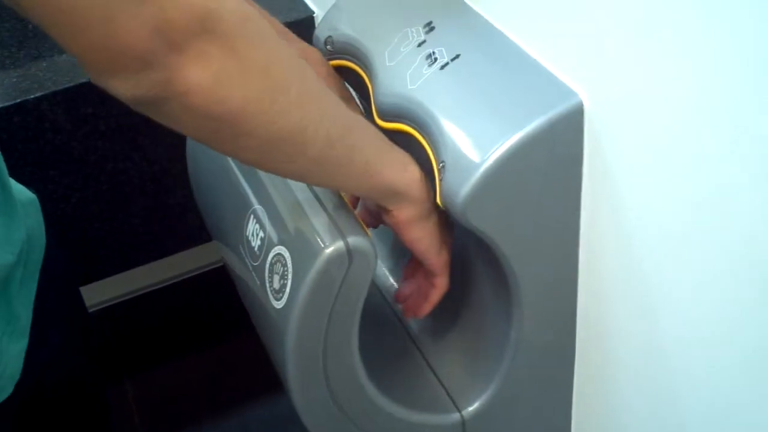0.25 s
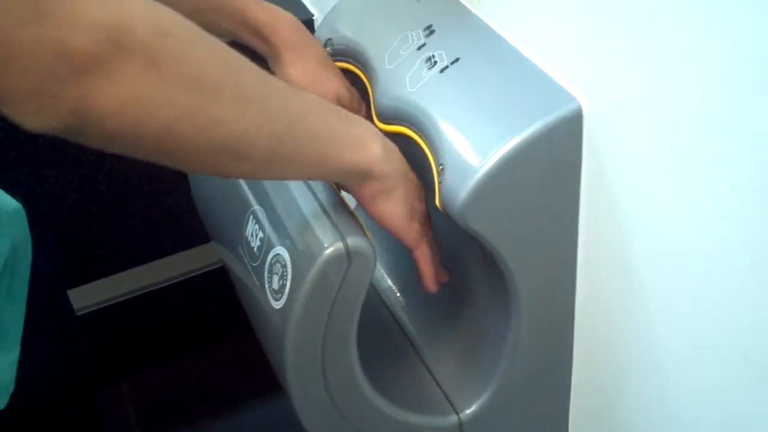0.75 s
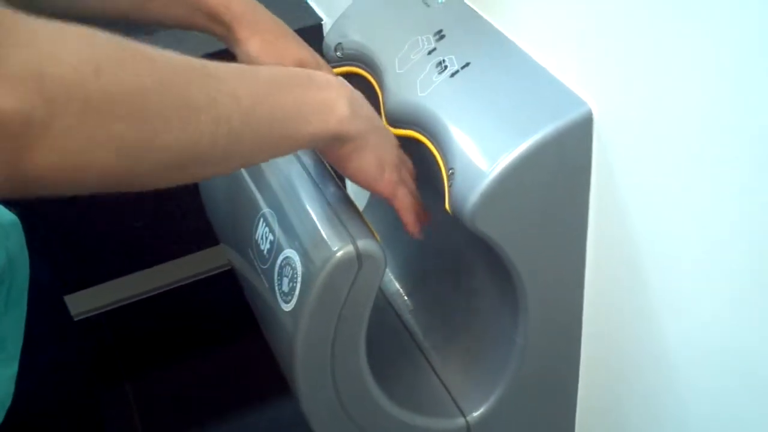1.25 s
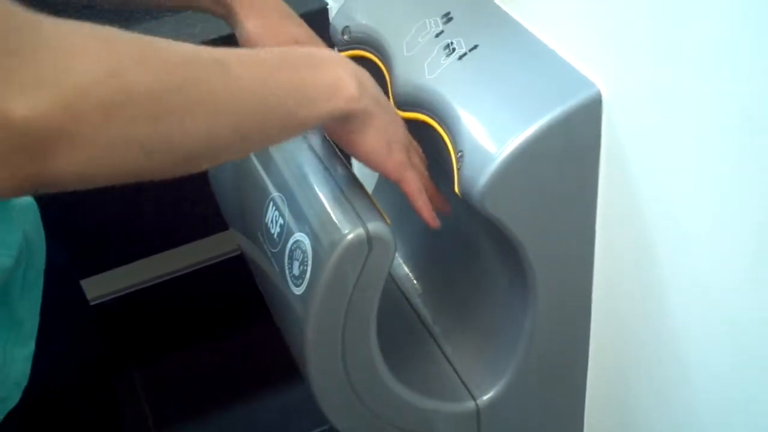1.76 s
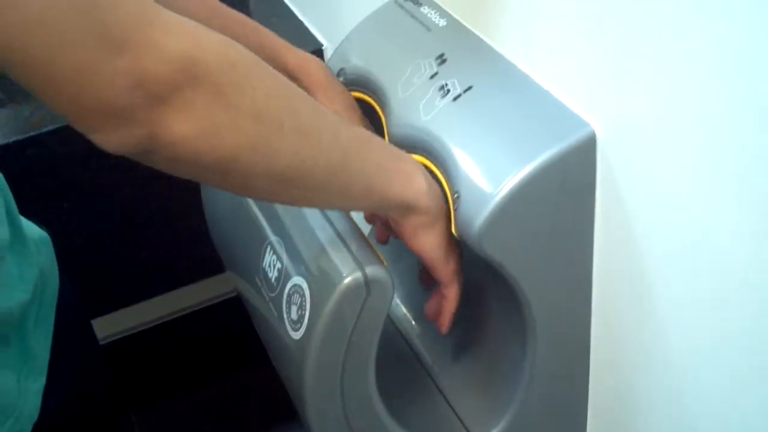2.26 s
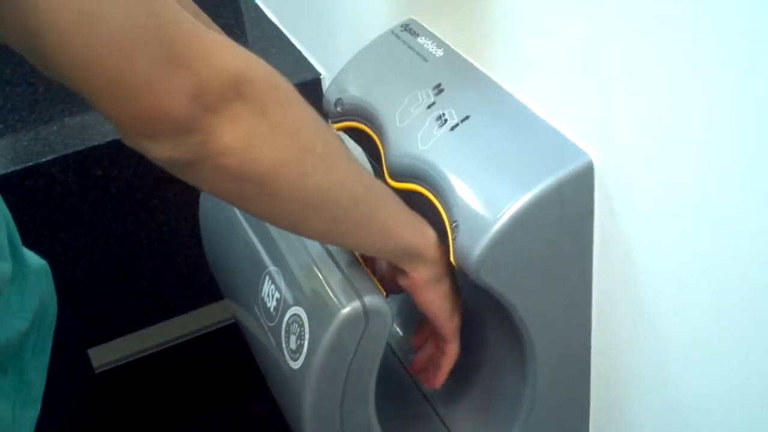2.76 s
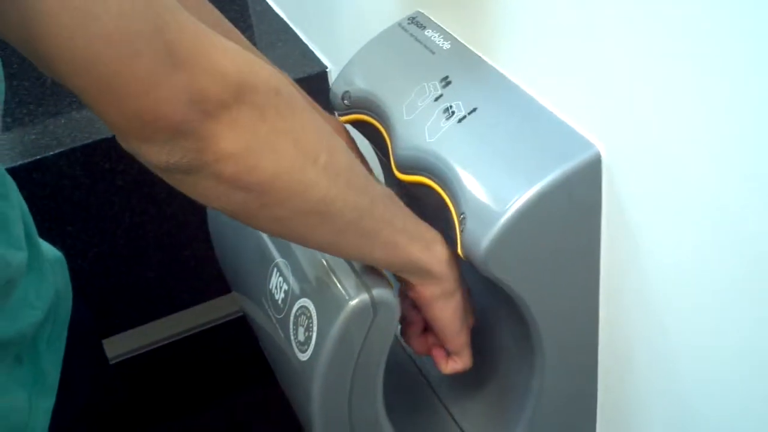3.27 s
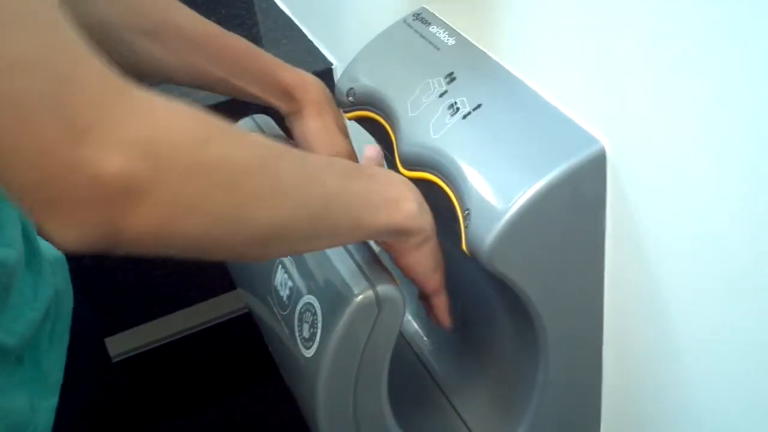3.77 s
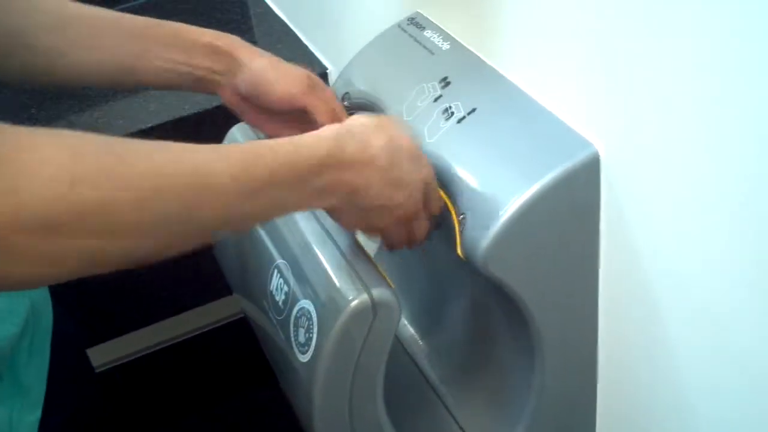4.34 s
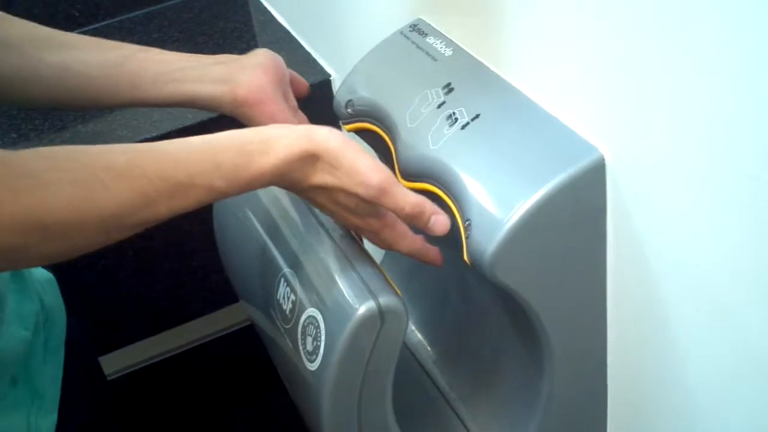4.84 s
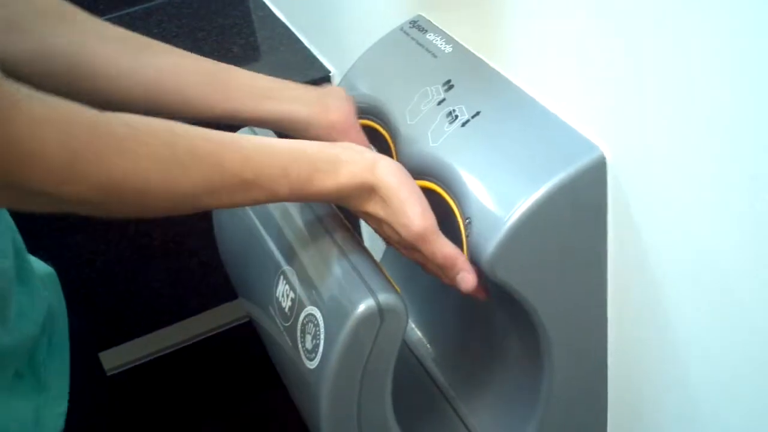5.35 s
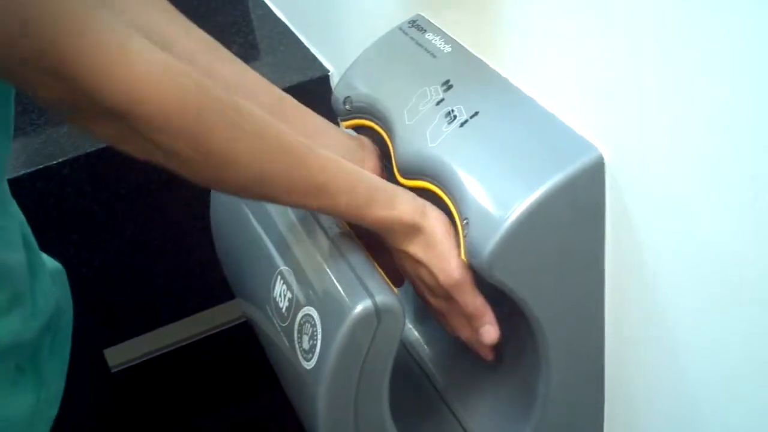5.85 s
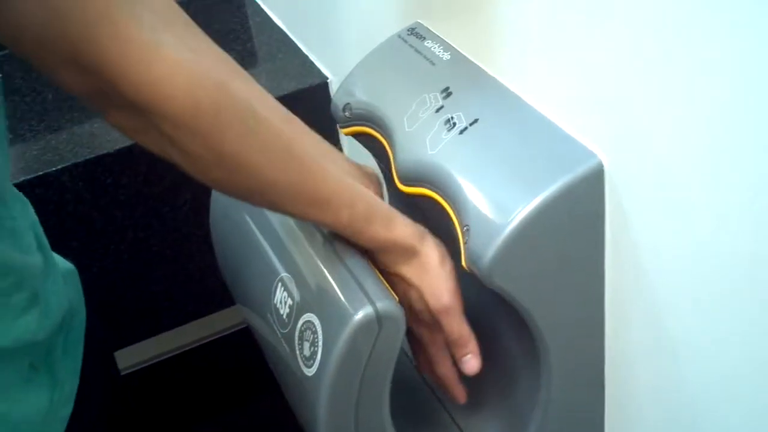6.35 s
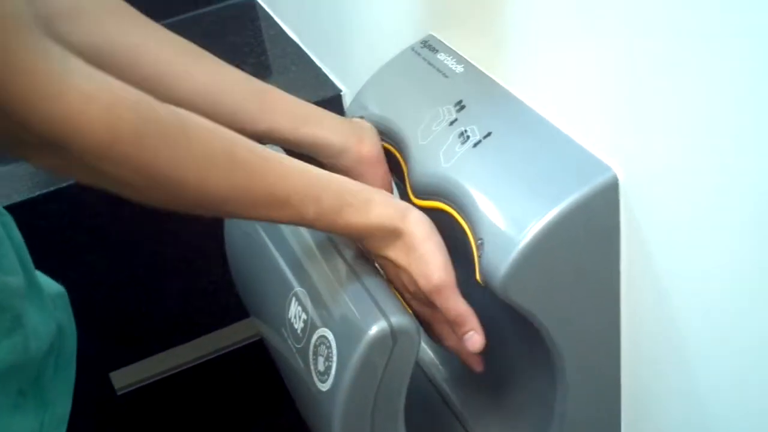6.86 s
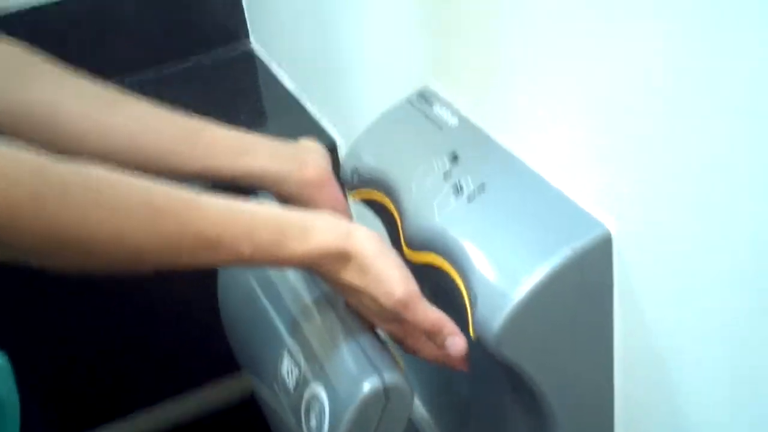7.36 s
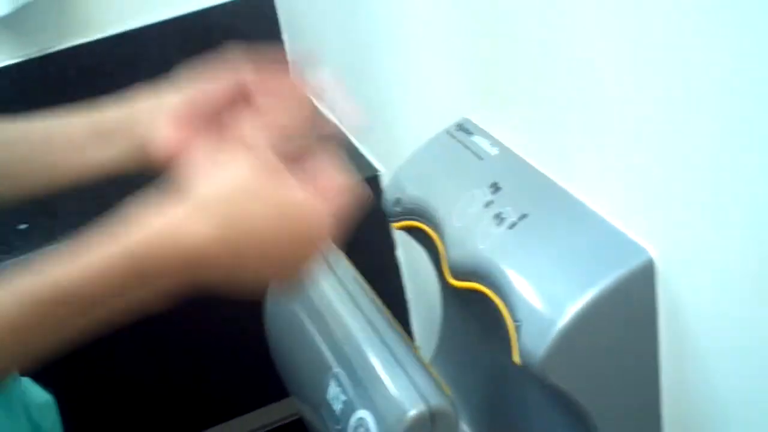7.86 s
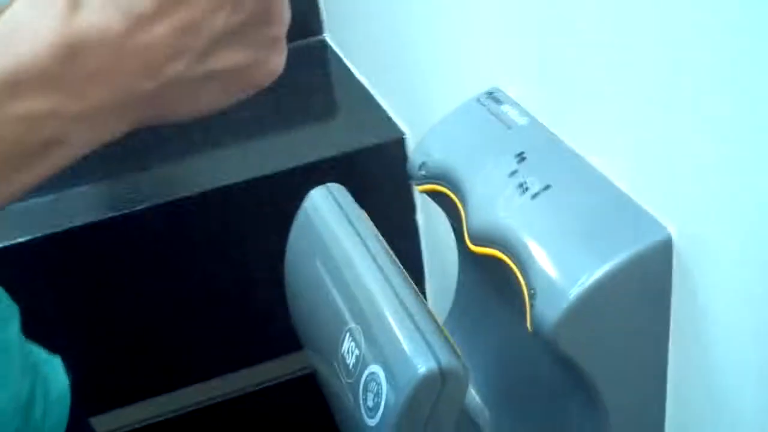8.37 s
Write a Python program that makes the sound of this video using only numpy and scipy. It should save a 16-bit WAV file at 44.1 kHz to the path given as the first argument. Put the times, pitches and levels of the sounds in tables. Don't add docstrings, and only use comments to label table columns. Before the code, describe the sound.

From the first instant a hand dryer blows at full strength in a small hard-walled room, heard close in wide stereo. A dense airy roar, splashing midrange and sharp hiss sit over a constant high whine near 1.5 kHz with a stronger tone an octave above. Hands sliding through the slot keep reshaping the blast: brighter spatter from about 1 to 2 s, a hiss flare near 2.4 s with a tiny whistle, then a duller, hollower dip around 3 s with low thumps. Wind puffs bump the microphone near 0.3, 1.6, 2.3 and 5 s. From 4 to 5.5 s the splash is strongest; it eases around 6 s. Hiss flares near 6.7 s and quick breathy whistles chirp about 7 s. After a last bright swell at 7.5 s the hands leave, splash falls, and a hollow hooting roar and whine continue to the cut at 8.6 s.

```python
import sys
import numpy as np
from scipy import signal
from scipy.fft import rfft, irfft, next_fast_len
from scipy.io import wavfile
from scipy.ndimage import uniform_filter1d, map_coordinates

SR = 44100
rng = np.random.default_rng(int(sys.argv[2]) if len(sys.argv) > 2 else 0)


def convert_level_to_amplitude(level_db):
    exponent = np.asarray(level_db, float) / 20
    return 10 ** exponent


def master_out(mix):
    frames = np.transpose(np.atleast_2d(mix))
    ceiling = np.clip(frames, -1, 1)
    pcm = np.round(ceiling * 32767).astype(np.int16)
    wavfile.write(sys.argv[1], SR, pcm)


N = 379701
QUIET_DB = -60


def jets():
    # f/Hz, level/dB
    drone_colour = [(20, -24), (70, -20.5), (120, -7), (170, 1.5), (220, -3), (300, 2.5), (500, -46)]
    roar_colour = [(120, -27), (230, 0), (300, -2.5), (550, 1), (750, -6.5), (1100, -13), (2500, -49)]
    splash_colour = [(300, -40), (650, -8), (900, -1), (1500, -1), (2150, 1), (2700, -2.5), (3200, -5),
                     (3800, -8.5), (5000, -12), (6000, -24), (7500, -50)]
    hiss_colour = [(1800, -40), (2800, -15), (3800, -10), (5300, -9), (6000, -4.5), (6500, -1.5), (8400, 0),
                   (9500, -2), (11000, -4.5), (12500, -6.5), (14500, -6.5), (15700, -5)]
    # t/s, skin struck/dB, slits uncovered/dB
    hands = [(0, -6, -3), (.12, -2, -3), (.4, -1.5, 2.5), (.65, -1.5, 1), (.95, 2.5, 0), (1.6, 2, -1),
             (2.08, 2.5, -0.5), (2.75, -6.5, -3), (3.05, -4.5, -5), (3.6, -1.5, -1.5), (4.1, 3.5, 0),
             (5.3, 4, -0.5), (5.63, 1.1, 0.5), (6.0, -1.5, 1.5), (6.78, -2.5, -1.3), (7.5, 2.5, -1.2),
             (7.8, -8, -4), (8.61, -7.5, -1)]
    # t/s, length/s, level/dB
    edges = [(.73, .18, 2.5), (1.15, 0.3, 3.5), (2.43, 0.41, 7), (3.76, 0.12, 1.5), (4.22, 0.2, 4),
             (4.87, 0.13, -1.5), (5.63, 0.18, -2.5), (6.08, 0.43, 1.5), (6.66, 0.21, 5.5),
             (7.07, 0.18, 2.5), (7.62, 0.19, 5.5)]
    # t/s, length/s, splash level/dB
    palms = [(1.2, 0.23, -1.5), (3.0, .08, -1), (3.25, 0.25, 0.5), (4.08, 0.18, 1.5), (4.3, 0.51, -2),
             (4.7, .2, -0.2), (4.87, .12, -2.5), (5.27, 0.15, 2), (6.8, 0.12, -1.6), (7.03, 0.12, 0.7),
             (7.5, .14, 1.5)]
    # t/s, length/s, roar level/dB
    cups = [(.05, .2, 1), (.68, 0.22, 1.5), (1.02, 0.14, 3.5), (1.6, 0.26, -1.5), (2.08, .08, 1.5),
            (2.66, 0.17, -3), (2.95, .12, -1.5), (3.1, .16, -3), (3.58, 0.43, 5), (4.98, .12, 3.5),
            (5.26, .16, 3.5), (5.63, 0.11, -2.5), (5.85, .3, 2), (6.45, 0.23, 1.5), (6.76, 0.21, -5.5),
            (7.04, 0.2, -5), (7.48, .3, 1.5), (7.9, 0.39, 2.5), (8.65, .6, 4.5)]
    # t/s, length/s, drone level/dB
    thumps = [(.3, 0.43, 3.5), (1.02, 0.19, 8), (1.8, .4, 5), (2.11, .05, -8), (2.5, .2, -5),
              (2.85, .15, 4), (3.07, .07, 8), (3.22, 0.089, 7), (3.45, 0.24, 8), (3.75, .2, 3),
              (4.3, 0.22, 4), (4.98, .14, 5), (5.8, 0.45, -3), (6.12, .2, -7), (6.5, 0.46, 6.5),
              (7.85, .3, -4)]
    choke = 1.2
    roar_follows = 0.34

    skin_db, slits_db = curves(hands)
    flare_db = swells(edges)
    drone_db = -44.5 + swells(thumps) - choke * flare_db + 1.3 * wobble(8.1)
    roar_db = -31 + roar_follows * skin_db + swells(cups) + 0.63 * wobble(9)
    splash_db = -26 + skin_db + swells(palms) + 0.19 * wobble(9)
    hiss_db = -24.5 + slits_db + flare_db

    drone = convert_level_to_amplitude(drone_db + 6) * rush(drone_colour, patchy_db=0.6)
    roar = convert_level_to_amplitude(roar_db - 1.87) * rush(roar_colour, patchy_db=-0.1)
    flutter_db = 0.28 * wobble(18) + 0.31 * wobble(60)
    splash = convert_level_to_amplitude(splash_db - 5.0) * rush(splash_colour, patchy_db=0.76)
    hiss = convert_level_to_amplitude(hiss_db - 1.0 + flutter_db) * rush(hiss_colour, patchy_db=0.44)
    return drone + roar + splash + hiss


def gaps():
    # t/s, length/s, from f/Hz, to f/Hz, level/dB
    hoots = [(3.25, .33, 180, 190, -31), (3.25, .6, 250, 600, -31.5), (4.85, .75, 190, 1850, -36),
             (5.56, .46, 158, 188, -34), (6.2, .45, 155, 175, -35.5), (5.95, .75, 1350, 1270, -41.5),
             (3.87, .45, 1350, 1760, -38), (6.83, .33, 2800, 3150, -39), (7.66, .45, 260, 390, -34),
             (7.85, 1.0, 390, 430, -31), (8.0, .8, 300, 320, -36), (7.95, .9, 520, 550, -34),
             (6.65, .5, 180, 240, -36), (7.35, .35, 2900, 3100, -42)]
    # t/s, length/s, from f/Hz, to f/Hz, level/dB
    whistles = [
        (6.915, .06, 2430, 2480, -38),
        (6.96, .065, 2750, 3200, -34),
        (6.985, .08, 2350, 2200, -39),
        (7.09, .08, 2900, 3050, -39),
        (2.375, .065, 3200, 3040, -39),
    ]
    hooting = sum(narrow(*glide(row, rise_s=.12, fall_s=.15), spread=.33) for row in hoots)
    whistling = sum(narrow(*glide(row, rise_s=.015, fall_s=.022), spread=.02) for row in whistles)
    return hooting + whistling


def motor():
    # shaft order, sum level/dB, difference level/dB, mains ripple depth/0-1
    orders = [
        (1, -40, -52, 0.27),
        (2, -30.5, -46.5, 0.54),
        (6, -58, -56, 0),
        (8, -68, -60, 0),
        (9, -48, -51.5, 0.7),
    ]
    # t/s, low orders/dB, high orders/dB
    shade = [(0, 0.5, 5), (.45, 2, 1), (.7, 3, 4), (1.25, 0.5, -10), (1.7, 3, 2), (2.25, 0.5, 1),
             (2.55, -2.5, -7), (2.85, -2.5, 3), (3.4, -0.5, 3), (4, 2, 1), (4.5, 1, 0), (5.1, 2.5, 5),
             (5.5, 1, 1), (6.2, -0.5, 2), (7, 0, -1), (7.6, 0, -2), (8.1, 0, -2), (8.61, 1.5, 3)]
    shaft_hz, ripple_hz = 1462.62, 100
    speed_hz = shaft_hz + .15 * wobble(5) + .2 * wobble(25)
    shaft_rad = 2 * np.pi * np.cumsum(speed_hz) / SR
    ripple = np.cos(2 * np.pi * ripple_hz * np.arange(N) / SR)
    low_db, high_db = curves(shade)
    lines = np.zeros((2, N))
    for order, sum_db, diff_db, depth in orders:
        if order > 4:
            drift_db = high_db + 2.4 * wobble(6.8)
        else:
            drift_db = low_db + 1.6 * wobble(6.8)
        level = convert_level_to_amplitude(np.array([[sum_db], [diff_db]]) + drift_db)
        lines += level * (1 + depth * ripple) * np.sin(round(order) * shaft_rad)
    return np.sqrt(2) * lines


def buffet():
    # t/s, level/dB
    puffs = [(0.094, -43), (0.232, -33), (0.346, -32), (0.478, -42), (0.597, -43.5), (0.937, -42),
             (1.484, -32), (1.601, -29), (1.683, -31), (1.87, -49), (1.968, -43), (2.05, -35), (2.284, -26),
             (2.372, -29), (2.463, -38), (3.008, -35), (3.234, -45), (3.354, -44), (3.437, -36),
             (3.637, -38), (4.954, -26), (5.864, -44), (6.41, -46), (6.51, -48)]
    # f/Hz, level/dB
    colour = [(20, -30), (50, -19), (100, -4), (200, -6), (350, -14), (700, -17), (1500, -60)]
    t = np.arange(N) / SR
    swell = convert_level_to_amplitude(-69) + sum(convert_level_to_amplitude(db - 9.3) * np.exp(-((t - s) / .035) ** 2) for s, db in puffs)
    noise = filtered(rng.standard_normal((2, N)), lambda hz: convert_level_to_amplitude(along(colour, hz)))
    return swell * unit(convert_level_to_amplitude(1.9 * wobble(49)) * noise)


def tiles(x, depth_db):
    # f/Hz, width/Hz, boost/dB
    modes = [(178, 13, 6), (232, 16, 3), (376, 14, 7), (421, 13, 6), (500, 20, 2), (549, 13, 7.5),
             (609, 15, 5.5), (706, 18, 6), (820, 30, 3), (1177, 30, 2), (1244, 30, 2.5), (1615, 28, 4),
             (1846, 50, 2), (2146, 30, 3), (2229, 20, 2.5)]
    knots = rng.standard_normal(SR // 32)

    def response(hz):
        ripple_db = depth_db * map_coordinates(knots, [hz / 18]) / (1 + (hz / 3000) ** 2)
        standing_db = sum(db / (1 + (2 * (hz - c) / w) ** 2) for c, w, db in modes)
        return convert_level_to_amplitude(ripple_db + standing_db)

    return filtered(x, response)


def at_ports(heard, other):
    # f/Hz, level/dB
    apart = [(100, -19), (180, -21.5), (300, -15.5), (420, -10.5), (700, -10.5), (1100, -8), (1700, 0),
             (3200, 0.5), (5500, -1), (7000, 1), (10000, 1.5), (13000, -0.5), (16000, 0)]
    # f/Hz, share/-1..1
    lean = [(150, .2), (700, .4), (950, -.3), (1400, 0), (2100, -.45), (3000, 0), (3800, 0.24), (4800, 0),
            (6700, -.35), (7600, .3), (9500, .6), (12300, .2), (14000, -.2), (15500, -.45)]
    # f/Hz, share/-1..1
    lag = [(130, -0.38), (300, 0.036), (450, -0.097), (800, -0.16), (1100, .1), (1500, 0), (2200, .3),
           (2800, 0.022), (6600, 0.038), (9500, -.1)]

    def tie(hz):
        return np.clip(along(lean, hz), -.7, .7) + 1j * np.clip(along(lag, hz), -.7, .7)

    tied = filtered(heard, lambda hz: convert_level_to_amplitude(along(apart, hz)) * tie(hz))
    loose = filtered(other, lambda hz: convert_level_to_amplitude(along(apart, hz)) * np.sqrt(1 - abs(tie(hz)) ** 2))
    return np.array([heard, tied + loose])


def rush(colour, patchy_db):
    z = signal.stft(rng.standard_normal((2, N)), nperseg=512)[2]
    field = rng.standard_normal(z.shape[1:])
    for axis in (0, 1):
        field = uniform_filter1d(field, size=8, axis=axis)
    pair = signal.istft(z * convert_level_to_amplitude(patchy_db * unit(field)), nperseg=512)[1][:, :N]
    return unit(filtered(pair, lambda hz: convert_level_to_amplitude(along(colour, hz))))


def narrow(hz, db, spread):
    sounding = db > QUIET_DB
    turns = np.cumsum(hz * sounding) / SR
    knots = rng.standard_normal((4, 1000))
    a, b, c, d = [map_coordinates(k, [turns * spread]) for k in knots]
    cos, sin = np.cos(2 * np.pi * turns), np.sin(2 * np.pi * turns)
    return convert_level_to_amplitude(db) * sounding * np.array([a * cos + b * sin, c * cos + d * sin])


def glide(row, rise_s, fall_s):
    s, length_s, from_hz, to_hz, db = row
    t = np.arange(N) / SR - s
    way = np.clip(t / length_s, 0, 1)
    eased = (1 - np.cos(np.pi * way)) / 2
    fade = np.clip(np.minimum(t / rise_s, (length_s - t) / fall_s), 0, 1)
    return from_hz * (to_hz / from_hz) ** eased, QUIET_DB + (db - QUIET_DB) * fade


def swells(rows):
    t = np.arange(N) / SR
    return sum(db * np.exp(-(2 * (t - s) / length_s) ** 2) for s, length_s, db in rows)


def curves(rows):
    s, *cols = np.transpose(rows)
    return [np.interp(np.arange(N) / SR, s, c) for c in cols]


def wobble(rate_hz):
    knots = rng.standard_normal(int(N * rate_hz / SR) + 4)
    return map_coordinates(knots, [np.arange(N) * rate_hz / SR])


def along(points, hz):
    f, v = np.transpose(points)
    return np.interp(np.log(hz + 1), np.log(f + 1), v)


def filtered(x, response):
    m = next_fast_len(N + 8192)
    return irfft(rfft(x, m) * response(np.fft.rfftfreq(m, 1 / SR)), m)[..., :N]


def unit(x):
    return x / np.sqrt(np.mean(x ** 2) + 1e-20)


def scene():
    air = tiles(jets() + gaps(), depth_db=1.64)
    both, apart = at_ports(*air) + motor() + buffet()
    return np.array([both + apart, both - apart])


def low_pass(x):
    return signal.sosfilt(signal.butter(12, 16230, fs=SR, output="sos"), x)


def record(dry):
    delay_samples, top_hz = 15, 15735
    late = np.pad(dry[::-1], ((0, 0), (delay_samples, 0)))[:, :N]
    mix = filtered(dry - late, lambda hz: hz < top_hz)
    return low_pass(mix)


dry = scene()
out = record(dry)
master_out(out)
```